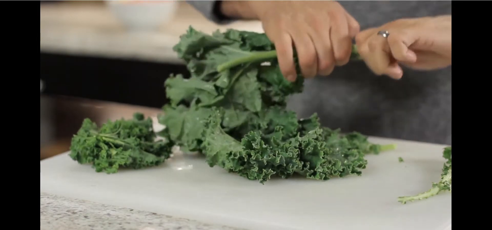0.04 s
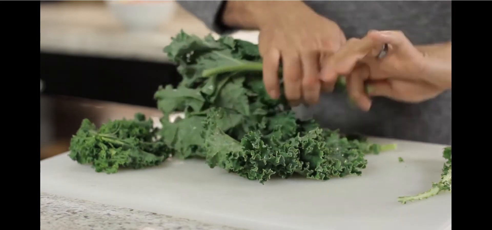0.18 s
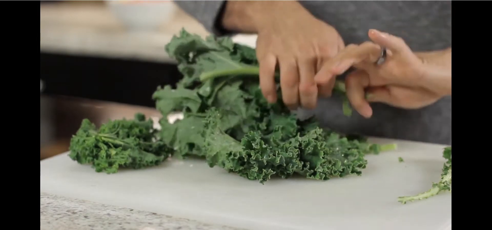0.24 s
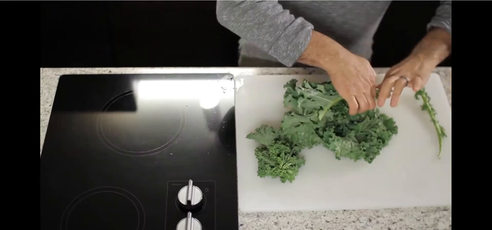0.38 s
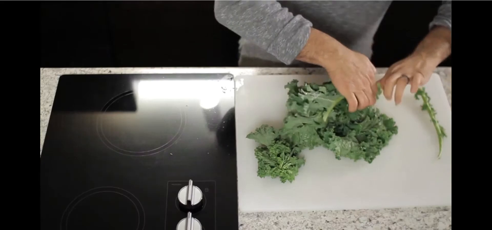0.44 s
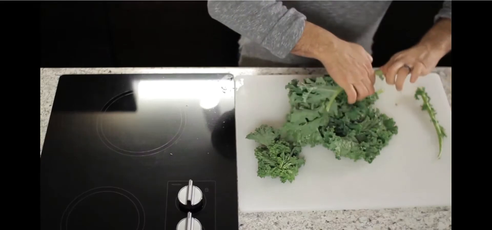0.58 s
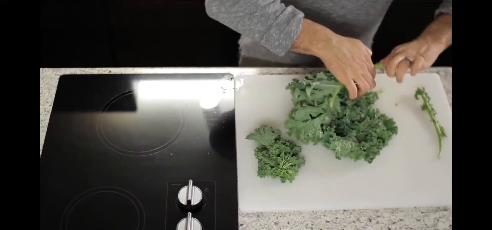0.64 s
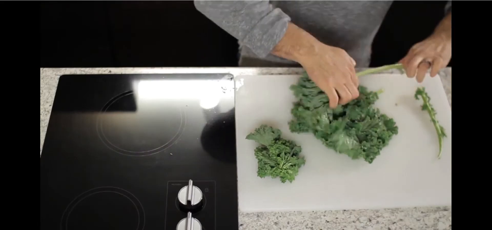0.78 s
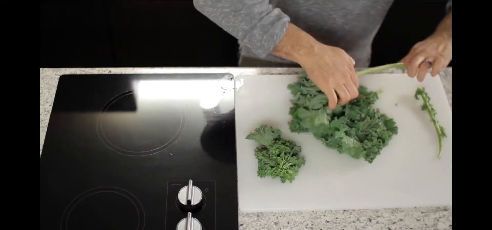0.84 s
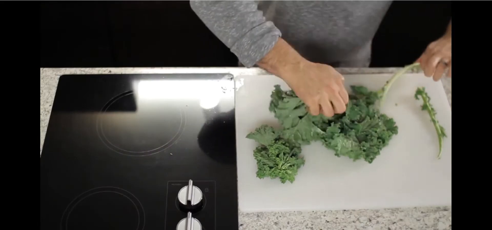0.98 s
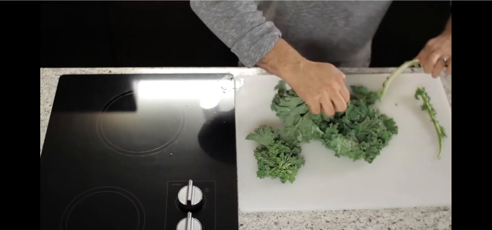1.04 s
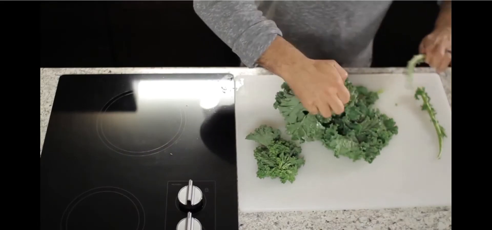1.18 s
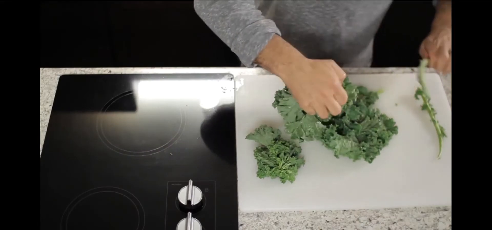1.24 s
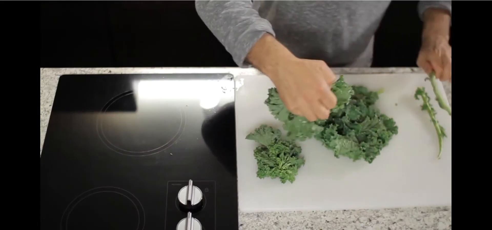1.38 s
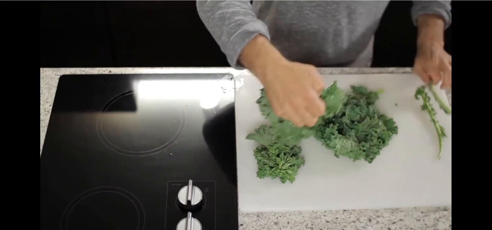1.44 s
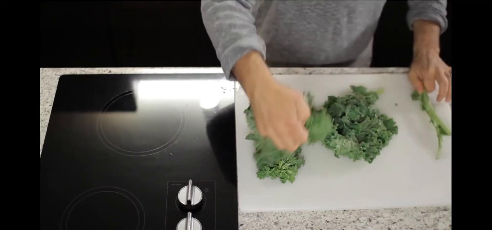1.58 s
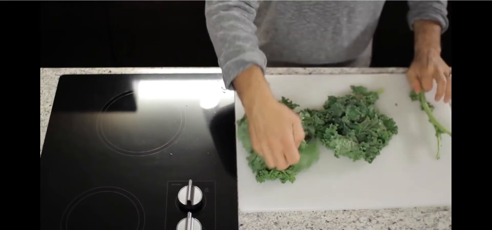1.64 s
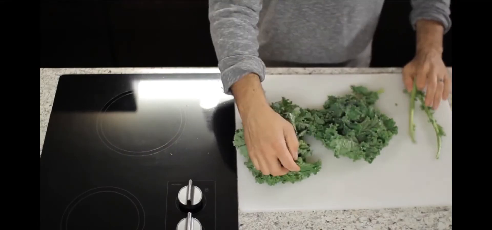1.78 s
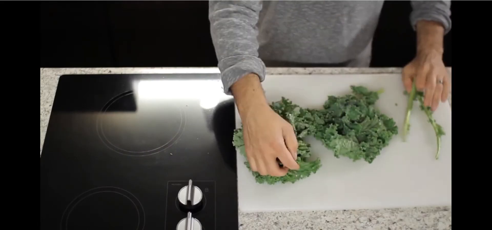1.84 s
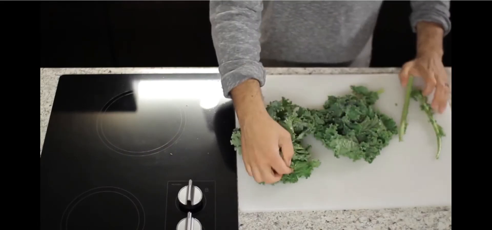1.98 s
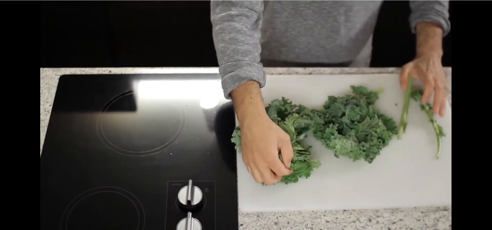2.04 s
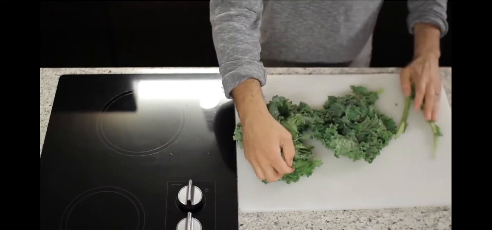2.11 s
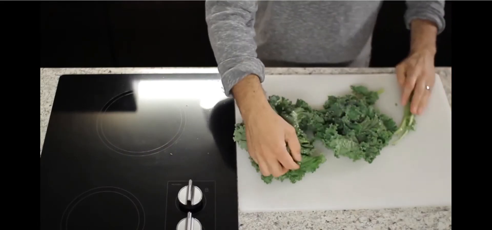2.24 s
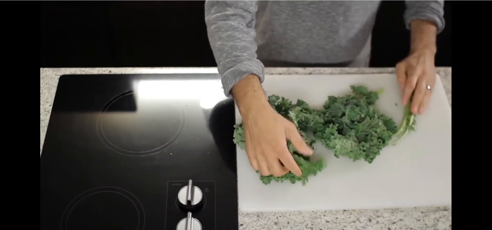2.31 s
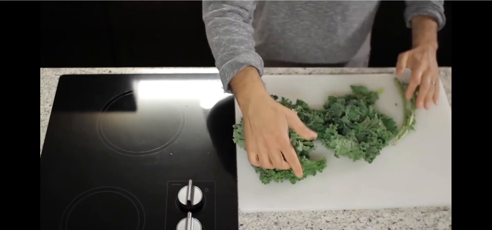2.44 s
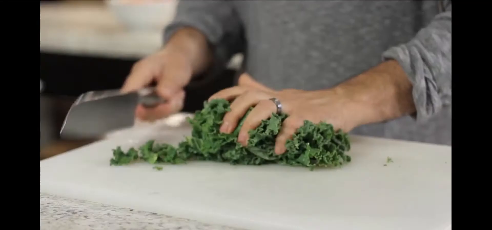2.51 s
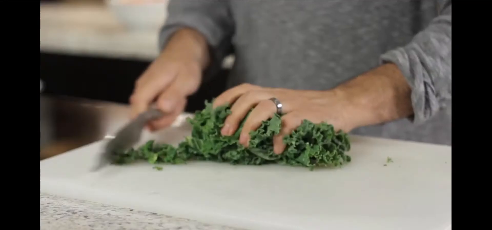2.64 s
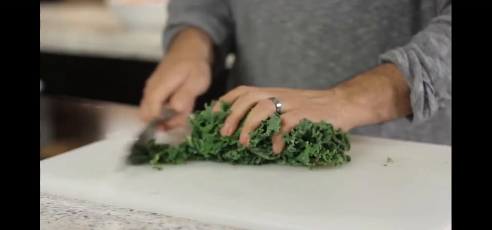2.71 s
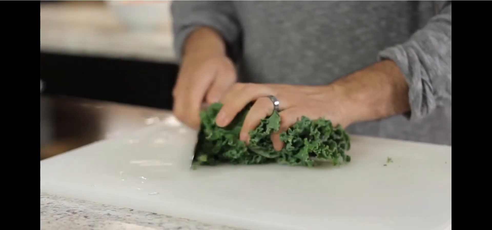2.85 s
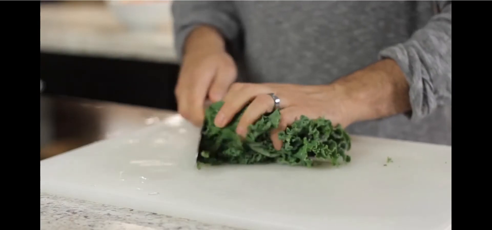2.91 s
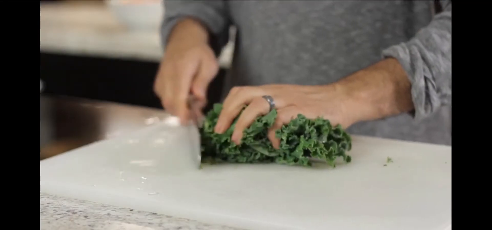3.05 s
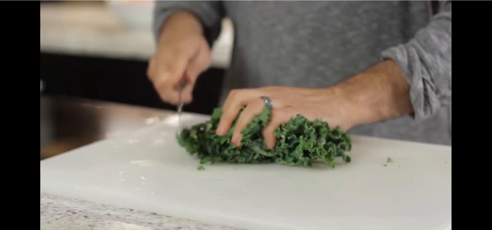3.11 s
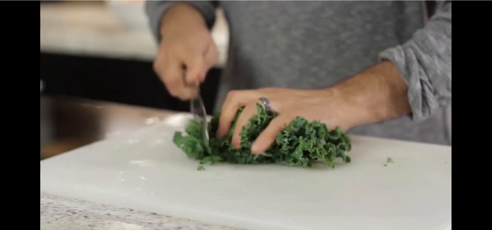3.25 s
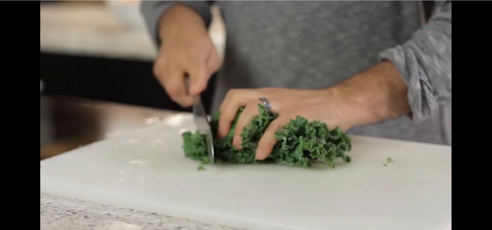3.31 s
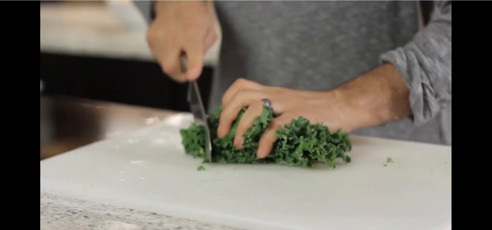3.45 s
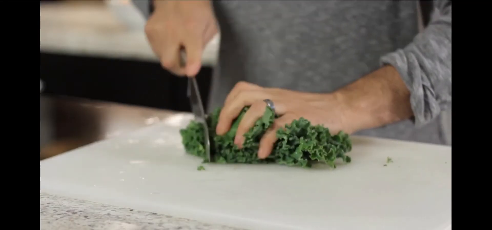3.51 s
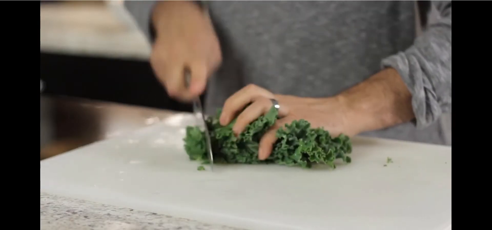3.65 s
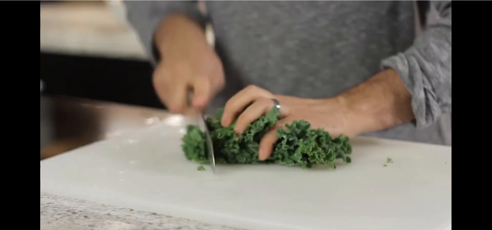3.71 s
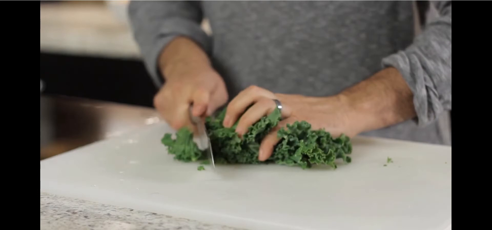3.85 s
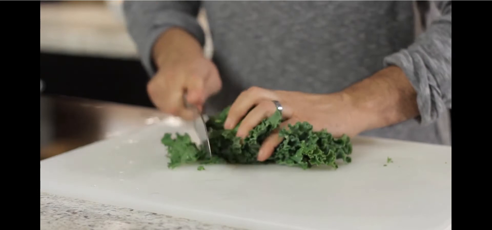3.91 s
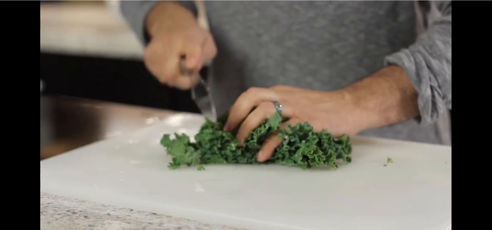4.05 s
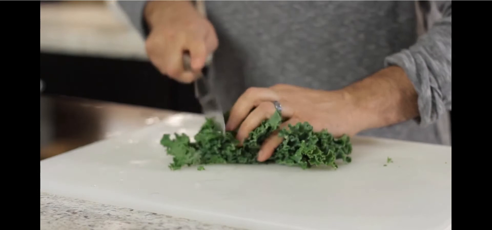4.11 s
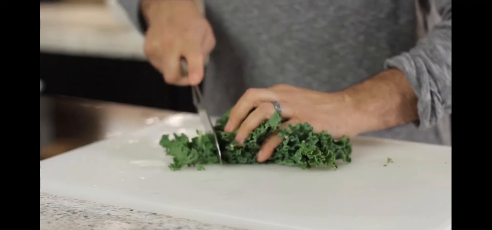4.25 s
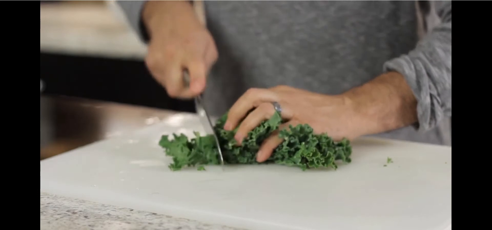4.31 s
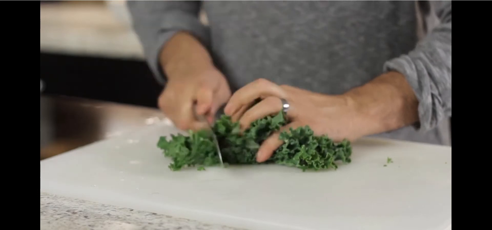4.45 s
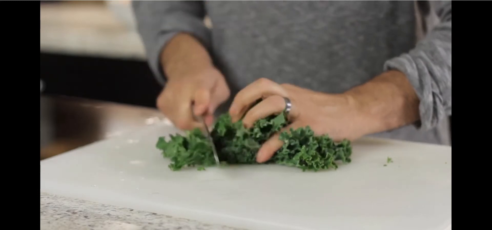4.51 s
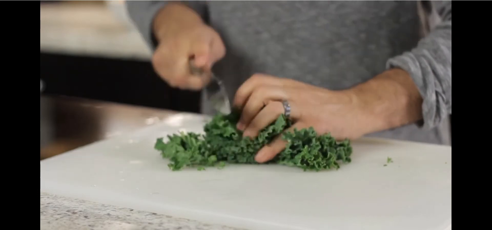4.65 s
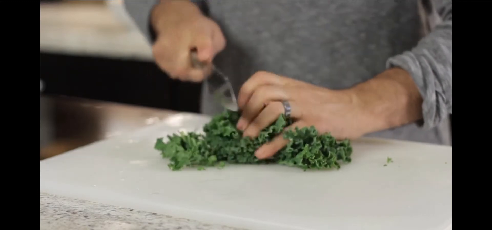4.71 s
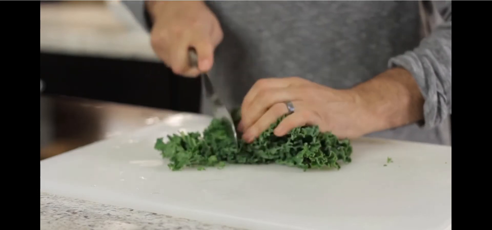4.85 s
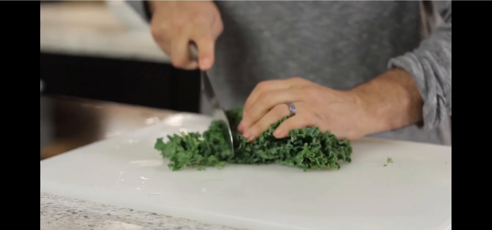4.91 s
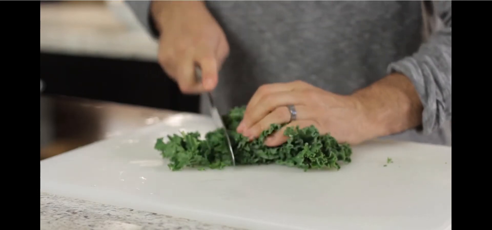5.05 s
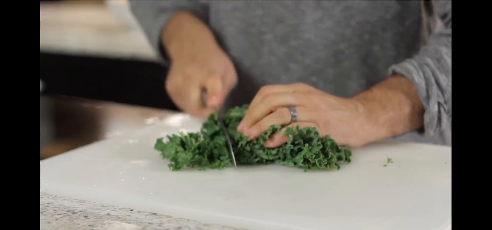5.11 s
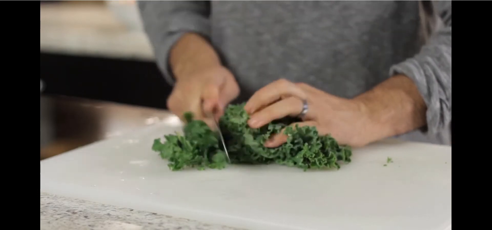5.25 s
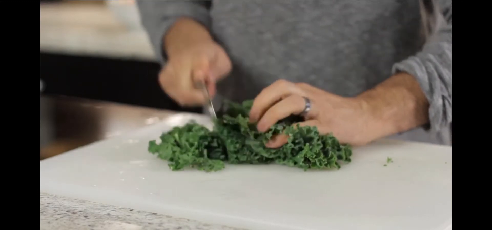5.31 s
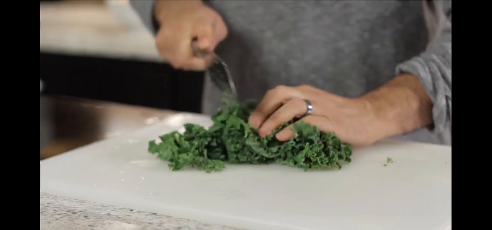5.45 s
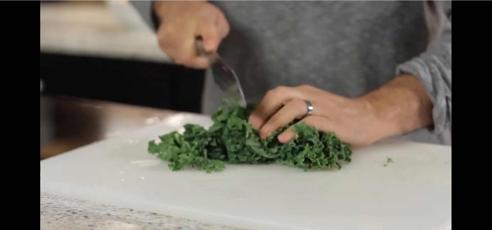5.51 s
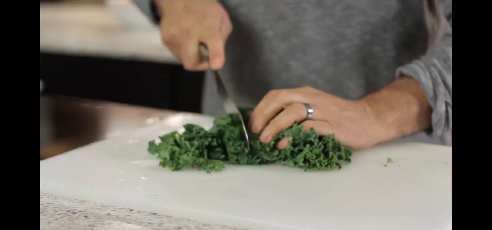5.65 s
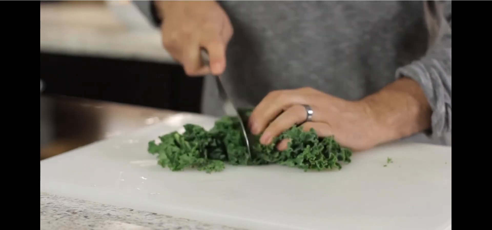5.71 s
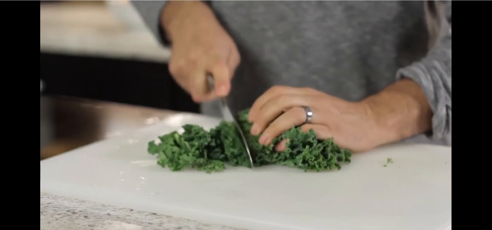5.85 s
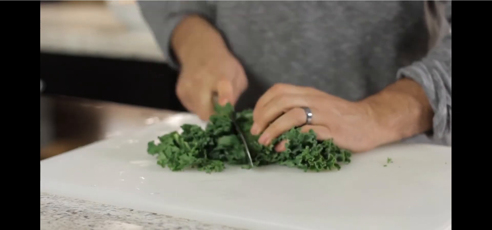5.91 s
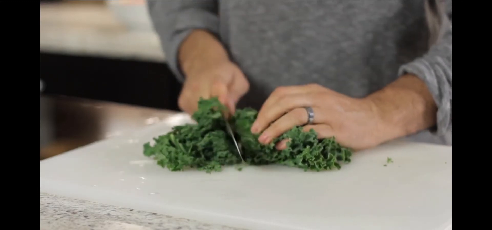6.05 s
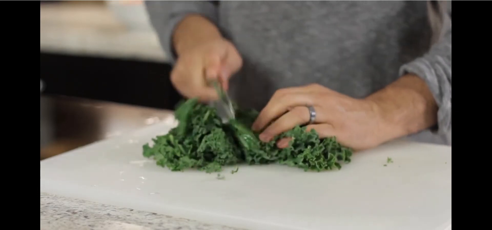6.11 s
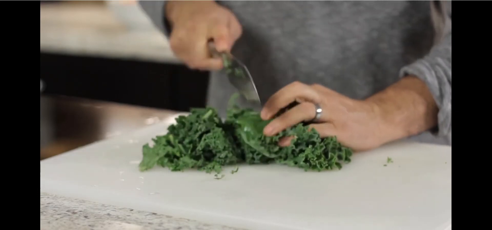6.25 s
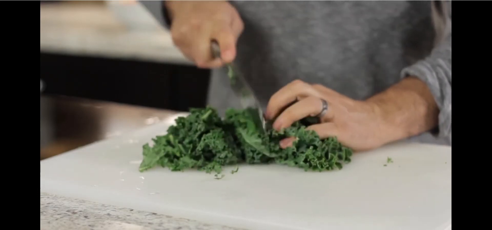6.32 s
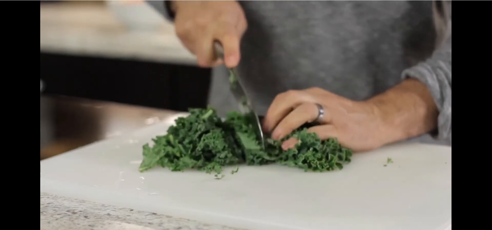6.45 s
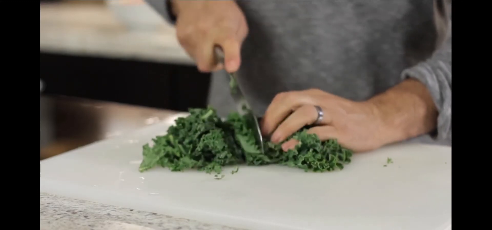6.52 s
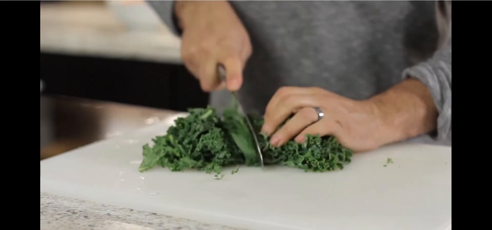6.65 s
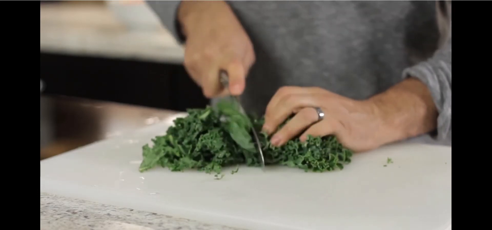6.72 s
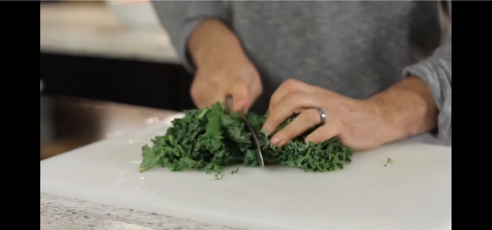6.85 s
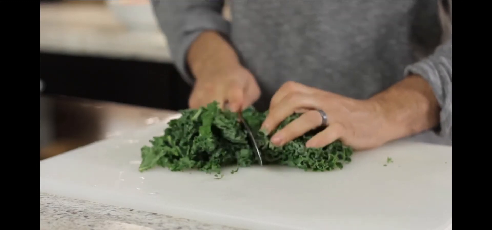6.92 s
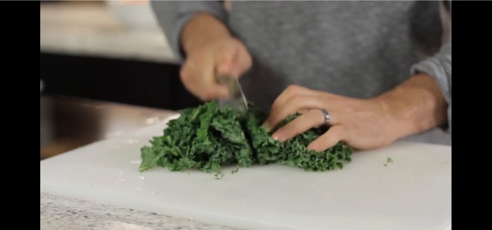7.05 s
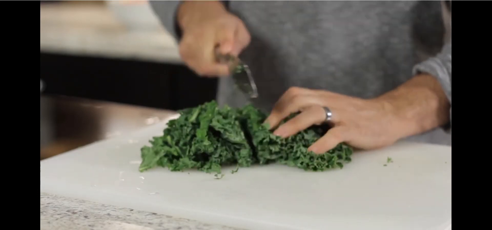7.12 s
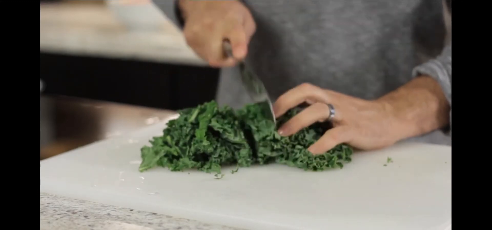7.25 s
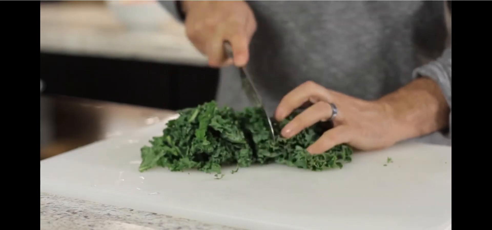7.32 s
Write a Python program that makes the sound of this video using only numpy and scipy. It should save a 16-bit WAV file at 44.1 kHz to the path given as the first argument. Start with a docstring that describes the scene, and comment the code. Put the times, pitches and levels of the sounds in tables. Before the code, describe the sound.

Close up in a small kitchen, a kale leaf rips off its stem with little snaps, and the leaves crinkle softly as they are bunched. A steel knife clacks onto a plastic board and scrapes across it with a brief, high squeal. Then it slices the greens in a run of crisp crunches that grow louder, with snapping ribs and dull knocks on the board. A low room hum and soft hiss lie underneath.

```python
"""Close, crisp rustling and crunching: kale being cut on a plastic board in a small kitchen.
A leaf rips off its stem and is bunched up; leaves crackle as clusters of tiny cracks. A steel knife
lands with a knock and scrapes across the board, friction ringing the blade. Then it slices: cells
burst, ribs snap, and the edge knocks and drags, driving the board's modes. Counter and cupboards
add a short tail. Behind it all: low room hum, soft hiss and a faint, steady leaf rustle."""
import sys
import numpy as np
from scipy import signal
from scipy.fft import rfft, irfft
from scipy.io import wavfile
from scipy.ndimage import uniform_filter1d

SR = 44100
rng = np.random.default_rng(int(sys.argv[2]) if len(sys.argv) > 2 else 0)


def log_audio(samples):
    """Write samples as a 16-bit WAV file to the path given in sys.argv[1]."""
    # one column per channel
    frames = np.atleast_2d(samples).T
    # limit to full scale, then quantise
    limited = np.clip(frames, -1, 1)
    pcm = np.round(limited * 32767).astype(np.int16)
    wavfile.write(sys.argv[1], SR, pcm)


N = 325458

# blade breaking through a leaf layer: start_s, hold_s, level_db, brightness_db
LAYER_CUTS = [(3.35, 0.018, -30.5, 2.5), (3.406, 0.037, -32, 0), (3.459, 0.013, -27, 1.5),
              (3.713, 0.035, -33, 2.5), (3.765, 0.026, -28, -1), (4.225, 0.0043, -22.5, -1),
              (4.362, 0.038, -36.5, 8.5), (4.415, 0.045, -30, 4), (4.47, 0.024, -25, 1),
              (4.901, 0.029, -25.5, 2.5), (5.067, .012, -26, 2.5), (5.089, 0.011, -15.5, -2.5),
              (5.136, 0.077, -23, -1.5), (5.635, 0.0048, -22, -2), (5.745, .02, -28, -5),
              (5.785, 0.048, -19.5, -2.5), (5.842, 0.033, -16.5, -6), (5.92, 0.036, -18, -7),
              (5.979, 0.019, -19.5, -3), (6.524, 0.017, -28.5, 5), (6.571, 0.065, -30.5, 2.5),
              (6.649, .035, -21, -2), (6.701, 0.038, -16, -5.5), (6.777, 0.14, -21.5, -3.5),
              (7.346, 0.0064, -29, 0)]
# ribs breaking: start_s, peak_db, brightness_db
RIB_SNAPS = [(0.4367, -23, -2), (0.5808, -15, 4), (0.603, -16, 1), (0.609, -13, 5), (0.648, -14, 11),
             (0.7504, -19, 12), (0.976, -13.5, 29), (1.1387, -18, 6), (1.5332, -25.5, -8),
             (1.6572, -14.5, 25), (3.05, -13.5, 0), (3.3498, -13.5, -3), (3.456, -2.5, 0),
             (3.7275, -17.5, 5), (4.037, -11.5, -3.5), (4.221, -6, 12), (4.4907, -9, 19), (4.6193, -6.5, 0),
             (4.7972, -12, -1), (4.9067, -2.5, 6), (4.916, -2, -6), (4.9454, -7, -7), (5.002, -8, 1.5),
             (5.097, 4, -5), (5.125, -5.5, 5), (5.141, -1, 0), (5.1808, -2, -11), (5.6359, -1, 1),
             (5.679, -9.5, 1), (5.7332, -4, -14), (5.78, -7, -2), (5.8425, 0, -2), (6.1945, -12.5, -4),
             (6.224, -15, -7), (6.39, -14, 2), (6.4203, -9, 1), (6.529, -4, 8), (6.541, -7, 0),
             (6.564, -8, -13), (6.646, -6.5, -6), (6.666, 1, -2), (6.8282, -1, -3), (6.9, -5, 2.5),
             (7.241, -17, -12), (7.3452, -7.5, 2)]
# leaf ripping off the stem: start_s, hold_s, level_db
STEM_RIPS = [(0.603, 0.042, -27.5), (0.755, 0.021, -30.5), (0.783, 0.032, -17.5), (0.821, 0.05, -14)]
# hand gathering the leaves: start_s, hold_s, level_db, brightness_db
HAND_GRIPS = [(0.002, 0.0097, -43, 5), (0.103, 0.012, -44.5, -5), (0.212, 0.03, -44.5, -3),
              (0.354, 0.012, -36, -9), (0.514, .008, -44, -1), (0.92, 0.074, -42.5, 9),
              (1.037, 0.043, -37.5, -6), (1.63, 0.072, -46, 4), (1.727, 0.037, -37.5, -1),
              (1.792, 0.027, -32.5, -2.5), (1.88, .03, -45.5, 6), (2.104, 0.12, -40.5, -0.5),
              (2.405, 0.041, -41.5, -8), (2.632, .02, -45, 3), (2.93, .06, -38.5, -4),
              (3.122, 0.068, -36.5, -3), (3.202, 0.029, -30.5, 0), (3.5, 0.031, -45, 8),
              (3.954, 0.029, -36.5, -1), (4.658, 0.053, -36, 4.5), (4.816, 0.014, -31.5, 6),
              (5.03, .02, -37, 5), (5.237, 0.044, -33, -0.5), (5.45, 0.029, -38, -1), (6.06, 0.062, -41, 0),
              (6.3, 0.057, -37, -8), (6.425, 0.0073, -30, 0), (7.021, 0.014, -37, -2.5),
              (7.257, 0.015, -37.5, 0.5)]
# faint crinkle under the resting hand: time_s, level_db
CRINKLE_LEVELS = [(0, -52), (0.5, -60), (1.1, -39.5), (1.4, -57.5), (2.0, -49), (2.3, -46.5), (2.55, -48),
                  (3.0, -37), (3.3, -44), (3.6, -35.5), (4.05, -40), (4.18, -50), (4.35, -39.5), (5.3, -39),
                  (5.58, -43.5), (6.2, -40.5), (7.12, -45.5), (7.38, -50)]
# edge landing on the board: start_s, impulse_db, contact_ms
EDGE_KNOCKS = [(2.65, -1.5, 2.5), (2.683, -9.5, 2.4), (3.473, -17.5, 1.8), (3.845, -33, 0.92),
               (4.299, -22, 1.9), (5.099, -14, 0.33), (5.786, -13.5, 2.7), (5.862, -12, 2.64),
               (6.732, -7, 0.55), (6.777, -14.5, 1.0)]
# knife bearing down, shaking the board: start_s, hold_s, level_db
KNIFE_PRESSES = [(2.785, .03, -36), (5.085, 0.021, -24.5), (5.792, 0.14, -32), (6.645, 0.16, -32)]
# blade sweeping across the board: start_s, hold_s, level_db
BLADE_SWEEPS = [(2.77, 0.13, -21.5)]
# blade catching in the sweep: start_s, hold_s, level_db
BLADE_SQUEALS = [(2.705, .06, -24.5), (2.795, 0.057, -10.5), (2.885, 0.0098, -14.5)]
# edge dragging in the plastic: start_s, length_s, first_hz, last_hz, level_db
EDGE_DRAGS = [(3.648, 0.17, 269.6, 465, -50.5), (3.805, 0.107, 333, 232, -46),
              (4.484, 0.12, 291.4, 139.6, -39), (5.246, 0.089, 318, 208, -45.5),
              (6.626, 0.07, 289, 162, -33)]

# modes of the board on the counter: pitch_hz, level_db, t60_s
BOARD_MODES = [(107, -27, .17), (175.5, -18.5, .26), (186, -11, .45), (232, 0, .25), (263, -9.5, .22),
               (296, -2.5, .06), (348, -7.5, .18), (406, -10, .12), (484, -8.5, .1), (623, -18.5, .13),
               (803, -23.5, .15)]
# bending modes of the blade: pitch_hz, level_db
BLADE_MODES = [(1394, -9), (2055, -5), (2846, -11), (3009, -7.5), (3537, 0), (3785, -3), (3925, 7.5),
               (4090, 4.5), (4547, -8), (4832, -12), (5425, -24), (6395, -7), (7224, -3), (11262, -16),
               (11693, -5)]
# tones locked to the slipping: pitch_hz, level_db
SQUEAL_TONES = [(3903, 0), (4547, -13), (7224, -21), (7803, -21), (9647, -21), (12152, -22), (12796, -24)]

# cells bursting under the edge: freq_hz, gain_db
CUT_SPECTRUM = [(40, -11), (150, -10), (550, -10), (1050, -16.5), (1700, -9), (2600, -2.5), (3800, 2),
                (5000, -1.5), (8000, -4), (10000, -6.5), (16000, -13)]
# ribs and veins snapping: freq_hz, gain_db
SNAP_SPECTRUM = [(100, -33), (1000, -13), (2000, -4.5), (3800, 8.5), (5000, 6), (8000, 4.5), (10000, -2.5),
                 (16000, -2.5), (18000, -14)]
# fibres parting: freq_hz, gain_db
TEAR_SPECTRUM = [(24, -35), (40, -13), (433, -11.5), (733, -13), (1630, -14), (2380, -4.5), (2570, -6.5),
                 (3470, 0), (5440, -0.5), (6490, -3), (8130, -3), (11300, -5), (16000, -11.5)]
# leaves rubbing: freq_hz, gain_db
RUSTLE_SPECTRUM = [(200, -17), (600, -13.5), (1100, -19.5), (1700, -11), (2500, -4.5), (3800, 0),
                   (5000, -5), (8000, -9), (10000, -13.5), (16000, -18)]
# steel striking bare plastic: freq_hz, gain_db
CLACK_SPECTRUM = [(80, -24), (500, 1.5), (1200, -7), (2700, -0.5), (3350, 8.5), (3800, -0.5), (4500, -2),
                  (7000, -15.5), (16000, -32)]
# steel rubbing on plastic: freq_hz, gain_db
SCRAPE_SPECTRUM = [(40, 0.5), (400, -1), (1000, -9.5), (2500, -4), (3800, 3), (5000, 3), (6000, -2),
                   (9000, -4), (13000, -2.5), (16000, -12)]
# steady background of low room hum, soft hiss and faint leaf rustle near 3.5 kHz: freq_hz, gain_db
BACKGROUND_SPECTRUM = [(18, -60), (30, -23), (53, -19), (127, -4), (157, -0.5), (345, -4.5), (540, -11.5),
                       (988, -24.5), (1590, -19.5), (1720, -16.5), (3580, -10.5), (9970, -20.5),
                       (14800, -19.5), (16000, -23.5)]


def leaf_cuts():
    """The edge bursts layer after layer of crisp leaf."""
    cells = crackle(rate_hz=3000, spread_db=2.0, ring_s=0.00037, cluster_db=1.0)
    cells = unit(colour(cells, CUT_SPECTRUM))
    return crunches(cells, LAYER_CUTS, attack_s=0.03, release_s=0.023)


def rib_snaps(splinter_s=0.0013):
    """One sharp crack, then brief splintering; thin ribs are brighter and splinter more."""
    out, t = np.zeros(N), np.arange(512) / SR
    for start_s, peak_db, bright_db in RIB_SNAPS:
        crack = 0.2 * undb(0.41 * bright_db) * rng.standard_normal(len(t)) * np.exp(-t / splinter_s)
        crack[0] -= 1  # the break itself
        tilted = [(hz, db + bright_db * np.clip(np.log2(hz / 5000), 0, 1)) for hz, db in SNAP_SPECTRUM]
        crack = colour(crack, tilted)
        add(out, start_s + 0.0005, undb(peak_db) * crack / np.abs(crack).max())
    return out


def stem_tears():
    """Fibres part in a dense, bright run along the stem."""
    fibres = crackle(rate_hz=5400, spread_db=2.5, ring_s=0.00028, cluster_db=1.5)
    return colour(fibres, TEAR_SPECTRUM) * envelope(STEM_RIPS, attack_s=0.0076, release_s=0.019)


def leaf_rustle():
    """Curly leaves rub and crease, swelling with each grip; the hand never quite rests."""
    gripped = crackle(rate_hz=3400, spread_db=3.0, ring_s=0.00066, cluster_db=1.5)
    gripped = leaf_folds(colour(gripped, RUSTLE_SPECTRUM), depth_db=3.0)
    gripped += undb(-12) * vein_ticks(rate_hz=58, spread_db=5.5)
    resting = crackle(rate_hz=3400, spread_db=1.5, ring_s=0.00036, cluster_db=-0.5)
    resting = leaf_folds(colour(resting, RUSTLE_SPECTRUM), depth_db=3.5)
    resting += undb(-9.5) * vein_ticks(rate_hz=50, spread_db=2)
    resting_db = np.interp(np.arange(N) / SR, *np.transpose(CRINKLE_LEVELS))
    return crunches(gripped, HAND_GRIPS, attack_s=0.073, release_s=0.025) + resting * undb(resting_db)


def leaf_folds(x, depth_db, rate_hz=18, bands=9):
    """Pockets between moving leaves favour now one band, now another. Rms 1."""
    spectrum, hz = rfft(x), np.arange(N // 2 + 1) * SR / N
    position = np.interp(np.log(hz + 1), np.log([1500, 15000]), [0, bands - 1])
    out = np.zeros(N)
    for k in range(bands):
        weight = np.maximum(0, 1 - np.abs(position - k))
        out += irfft(spectrum * weight, N) * undb(depth_db * wander(rate_hz))
    return unit(out)


def vein_ticks(rate_hz, spread_db):
    """Small veins give way in lone ticks. Rms 1."""
    sizes = undb(spread_db * np.minimum(rng.exponential(size=N), 2.5))
    breaks = rng.random(N) < rate_hz / SR
    return unit(colour(sizes * breaks, SNAP_SPECTRUM))


def board_knocks():
    """The edge lands and presses on the board; a leaf cushion makes the push longer and duller."""
    force = np.zeros(N)
    for start_s, impulse_db, contact_ms in EDGE_KNOCKS:
        push = np.hanning(int(contact_ms * SR / 1000))
        add(force, start_s, undb(impulse_db) * push / push.sum())
    # each yielding leaf layer jolts the board
    jolts = crackle(rate_hz=690, spread_db=2, ring_s=0.00017, cluster_db=-2.5)
    shaking = level_out(board(jolts), window_samples=2600)
    return board(force) + shaking * envelope(KNIFE_PRESSES, attack_s=0.021, release_s=0.074)


def board(force, radiation_hz=140):
    """Force rings the board's modes; the small slab radiates little bass."""
    t = np.arange(SR // 2) / SR
    ring = sum(undb(db) * np.sin(2 * np.pi * hz * t) * decay(t, t60_s) for hz, db, t60_s in BOARD_MODES)
    ring = butter(ring, 4, radiation_hz, "high")
    return signal.oaconvolve(force, ring / np.abs(ring).max())[:N]


def blade_clack(start_s=2.649, impact_s=0.0027, decay_s=0.038):
    """The first landing strikes bare plastic, with no leaves beneath."""
    out, t = np.zeros(N), np.arange(SR // 5) / SR
    burst = rng.standard_normal(len(t)) * (np.exp(-t / decay_s) + 2.1 * np.exp(-t / impact_s))
    add(out, start_s, burst)
    return colour(out, CLACK_SPECTRUM) * undb(-19.5)


def blade_scrape(t60_s=0.21):
    """Friction rings the blade's main modes; many weak treble modes colour the hiss."""
    t = np.arange(SR // 4) / SR
    fade = decay(t, t60_s)
    slips = crackle(rate_hz=8000, spread_db=1.5, ring_s=0.0003, cluster_db=1.0)
    main_modes = fade * sum(undb(db) * np.cos(2 * np.pi * hz * t) for hz, db in BLADE_MODES)
    steel = unit(signal.oaconvolve(slips, main_modes)[:N])
    friction = colour(slips, SCRAPE_SPECTRUM)
    weak_modes = butter(fade * rng.standard_normal(len(t)), 4, 900, "high")
    hiss = friction * undb(-2) + unit(signal.oaconvolve(friction, weak_modes)[:N]) * undb(-1.5)
    return (hiss + steel * undb(2.5)) * envelope(BLADE_SWEEPS, attack_s=0.13, release_s=0.0089)


def blade_squeal(flutter_db=1.5, jitter_hz=6):
    """The blade catches; a few tones lock to the slipping."""
    tones = np.zeros(N)
    for hz, db in SQUEAL_TONES:
        tones += undb(db + flutter_db * wander(70)) * sine(hz + jitter_hz * wander(80))
    return unit(tones) * envelope(BLADE_SQUEALS, attack_s=0.03, release_s=0.007)


def edge_drags(flutter_db=3.5):
    """The edge sticks and slips in its groove; the gliding groan stirs the board."""
    groan = np.zeros(N)
    pitch_ratio = 1 + 0.2 * wander(77)
    for start_s, length_s, first_hz, last_hz, level_db in EDGE_DRAGS:
        n = int(length_s * SR)
        hz = np.geomspace(first_hz, last_hz, n) * pitch_ratio[int(start_s * SR):][:n]
        add(groan, start_s, undb(level_db) * unit(np.hanning(n) * sine(hz)))
    groan *= undb(flutter_db * wander(90))
    return groan + unit(board(groan)) * np.std(groan) * undb(-3.5)


def kitchen(x, wet_db=-11, low_t60_s=0.32, high_t60_s=0.17, split_hz=2800, delay_s=0.003):
    """Counter and cupboards add a short, thin tail; treble dies first."""
    t = np.arange(SR // 2) / SR
    low = butter(rng.standard_normal(len(t)), 4, split_hz) * decay(t, low_t60_s)
    high = butter(rng.standard_normal(len(t)), 4, split_hz, "high") * decay(t, high_t60_s)
    tail = butter((low + 1.1 * high) * (t > delay_s), 2, 450, "high")
    return x + undb(wet_db) * signal.oaconvolve(x, tail / np.linalg.norm(tail))[:N]


def steady_background(level_db=-49):
    """Low room hum, soft hiss and a faint leaf rustle near 3.5 kHz."""
    return colour(rng.standard_normal(N), BACKGROUND_SPECTRUM) * undb(level_db)


def crackle(rate_hz, spread_db, ring_s, cluster_db, crack_samples=48):
    """Tiny cracks of uneven size, each with its own ring, clustered in avalanches."""
    onsets = np.flatnonzero(rng.random(N) < rate_hz / SR)[:, None]
    strength = undb(spread_db * np.minimum(rng.exponential(size=N), 3.5))[onsets]
    lag = np.arange(crack_samples)
    places = onsets + lag
    noise = rng.standard_normal(2 * N)
    offsets = rng.integers(0, N - crack_samples, N)[onsets]
    cracks = strength * noise[places + offsets] * np.exp(-lag / (ring_s * SR))
    train = np.bincount(places.ravel(), cracks.ravel(), N + crack_samples)[:N]
    # the hand feeds energy in steadily, so avalanches even out over time
    return level_out(train * undb(cluster_db * avalanches()), window_samples=1200)


def avalanches(rate_hz=110, decay_s=0.0053):
    """A crack sets off its neighbours: activity jumps, then dies. Mean 0, std 1."""
    triggers = (rng.random(N) < rate_hz / SR) * (0.5 + rng.random(N))
    activity = np.tanh(signal.lfilter([1], [1, -np.exp(-1 / (decay_s * SR))], triggers) / 2)
    return (activity - activity.mean()) / activity.std()


def crunches(texture, rows, attack_s, release_s, treble_hz=7500):
    """Gate a texture into events; crisper leaf, more treble."""
    body_rows = [(start_s, hold_s, db) for start_s, hold_s, db, _ in rows]
    treble_rows = [(start_s, hold_s, db + bright_db) for start_s, hold_s, db, bright_db in rows]
    treble = signal.sosfiltfilt(signal.butter(2, treble_hz, "high", fs=SR, output="sos"), texture)
    body = (texture - treble) * envelope(body_rows, attack_s, release_s)
    return body + treble * envelope(treble_rows, attack_s, release_s)


def envelope(rows, attack_s, release_s):
    """Event gain: full by start_s, held, then decaying. Overlaps add in power."""
    t, power = np.arange(N) / SR, np.zeros(N)
    for start_s, hold_s, level_db in rows:
        near = slice(*np.searchsorted(t, [start_s - attack_s, start_s + hold_s + 10 * release_s]))
        age_s = t[near] - start_s
        rise = np.minimum(1 + age_s / attack_s, 1) ** 2
        fall = np.exp(-np.maximum(age_s - hold_s, 0) / release_s)
        power[near] += (undb(level_db) * rise * fall) ** 2
    return np.sqrt(power)


def colour(x, spectrum, taps=2048):
    """Minimum-phase, unit-energy filter of the given spectral shape."""
    hz, db = np.transpose(spectrum)
    bin_hz = np.arange(taps // 2 + 1) * SR / taps
    gain = undb(np.interp(np.log(bin_hz + 1), np.log(hz), db))
    cepstrum = irfft(np.log(gain))
    cepstrum[1:taps // 2] *= 2
    cepstrum[taps // 2 + 1:] = 0
    response = irfft(np.exp(rfft(cepstrum)))
    return signal.oaconvolve(x, response / np.linalg.norm(response))[:len(x)]


def wander(rate_hz):
    """Smooth random drift, rms 1."""
    return unit(butter(rng.standard_normal(N), 2, rate_hz))


def butter(x, order, cutoff_hz, kind="low"):
    """Causal Butterworth filter."""
    return signal.sosfilt(signal.butter(order, cutoff_hz, kind, fs=SR, output="sos"), x)


def sine(hz):
    """Sine following a pitch curve."""
    return np.sin(2 * np.pi * np.cumsum(hz) / SR)


def decay(t, t60_s):
    """Fall of 60 dB per t60_s."""
    return np.exp(-np.log(1000) * t / t60_s)


def level_out(x, window_samples):
    """Hold the running rms near 1."""
    return x / np.sqrt(uniform_filter1d(x ** 2, size=window_samples) + 1e-9)


def unit(x):
    """Scale to rms 1."""
    return x / np.sqrt(np.mean(x ** 2))


def undb(db):
    """Decibels to gain."""
    return 10 ** (np.asarray(db) / 20)


def add(track, start_s, sound):
    """Mix in at start_s."""
    start = int(start_s * SR)
    track[start:start + len(sound)] += sound[:N - start]


def scene():
    """Leaves, knife and board in the kitchen, over a steady background. Mono."""
    background = steady_background()
    leaves = leaf_rustle() + stem_tears() + leaf_cuts() + rib_snaps()
    knife = board_knocks() + blade_clack() + edge_drags() + blade_scrape() + blade_squeal()
    return (kitchen(leaves + knife) + background)[None]


def record(dry, ceiling=0.55, top_hz=15950):
    """Soft peak limit, then a steep low-pass."""
    rounded = dry / (1 + (dry / ceiling) ** 4) ** (1 / 4)
    return signal.sosfilt(signal.ellip(10, 0.2, 70, top_hz, fs=SR, output="sos"), rounded)


dry = scene()
out = record(dry)
log_audio(out)
```